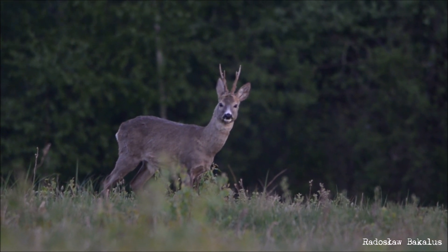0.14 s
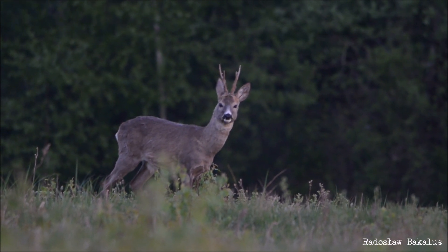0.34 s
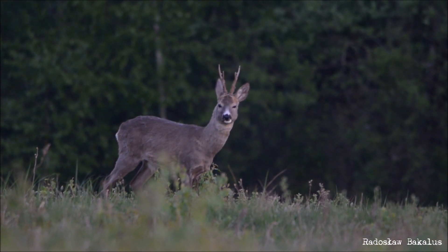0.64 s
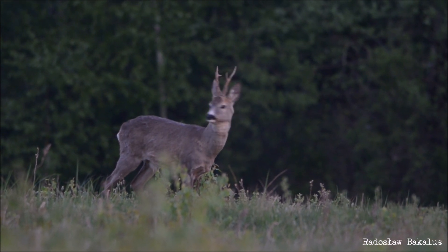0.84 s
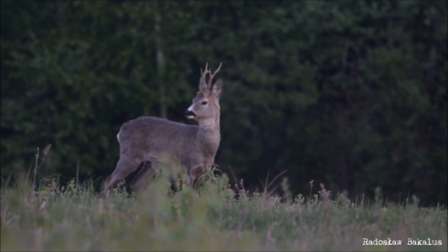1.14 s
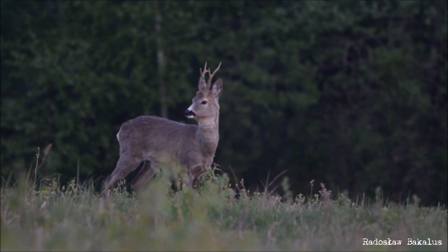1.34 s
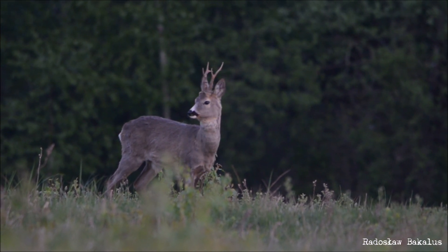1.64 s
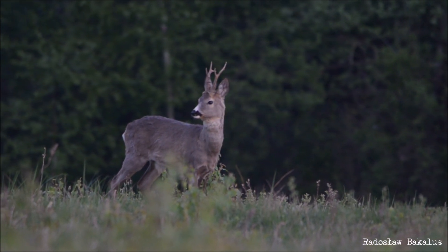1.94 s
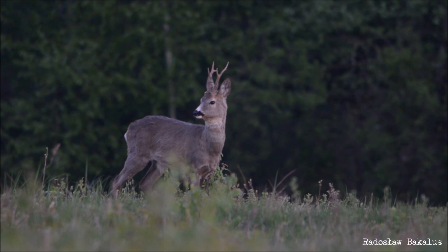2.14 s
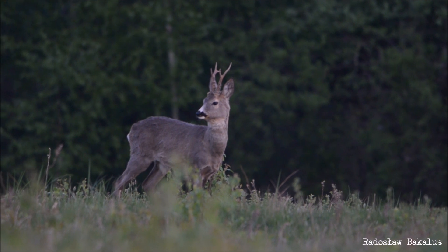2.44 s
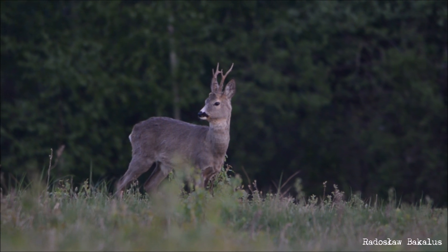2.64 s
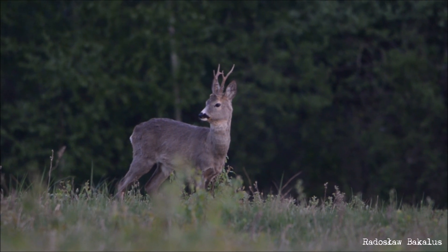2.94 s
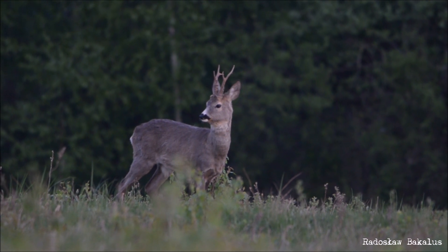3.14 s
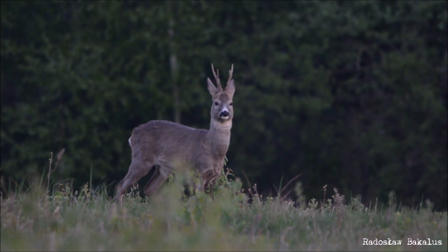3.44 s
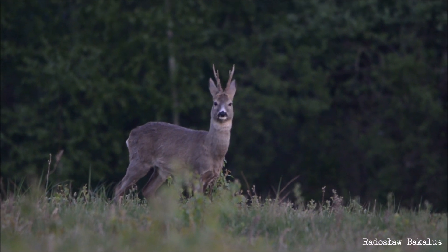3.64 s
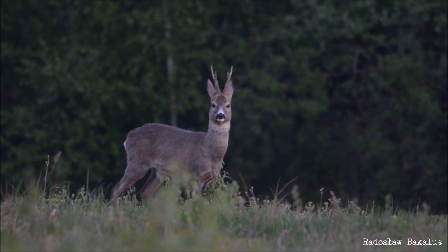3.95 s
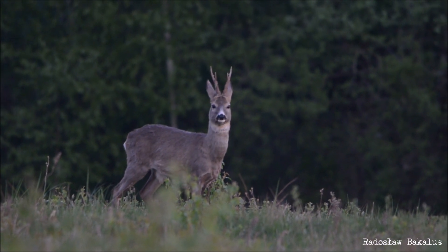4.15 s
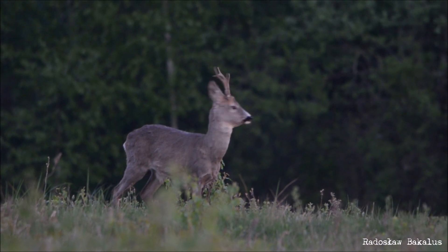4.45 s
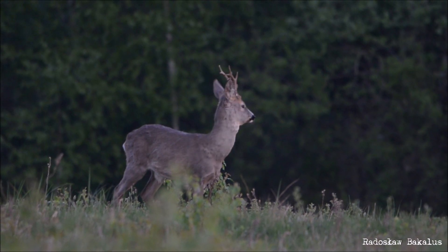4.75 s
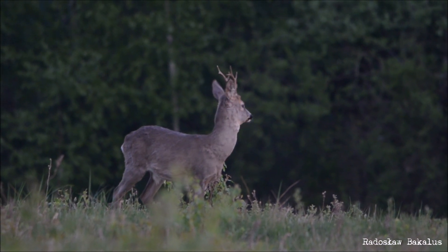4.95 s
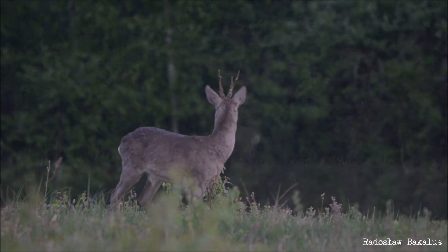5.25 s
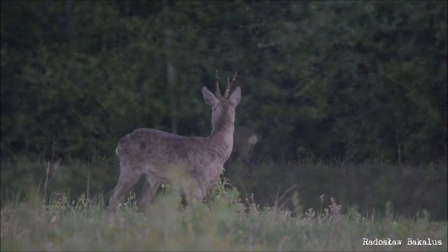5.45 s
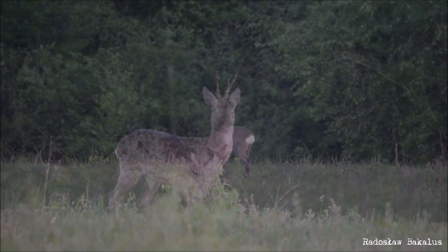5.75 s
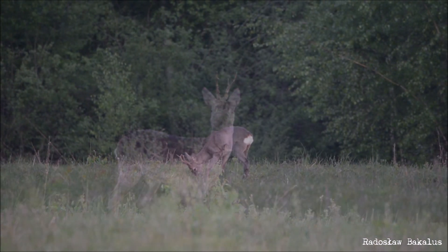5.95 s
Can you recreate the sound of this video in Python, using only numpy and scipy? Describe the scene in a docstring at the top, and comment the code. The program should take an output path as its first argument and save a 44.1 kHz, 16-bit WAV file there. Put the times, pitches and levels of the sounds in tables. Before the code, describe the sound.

Songbirds at a dusky forest edge: faint twitter and distant calls, housing clicks from a handled camera, then a loud close song over soft hiss.

```python
"""A meadow at a forest edge at dusk, heard through a small camera microphone: shaped noise as hiss that
grows louder near the end. Far birds among the trees are gliding sines sent through a decaying noise echo;
smooth bent whistles, low ones and one high falling one, sound in the open. The camera's plastic housing
snaps as it is handled: ticks ring damped modes. Songbirds, loud close ones and fainter distant ones, run
through warbles, swoops, trills and buzzes, all sines bent in pitch and level."""
import sys
import numpy as np
from scipy import signal
from scipy.fft import rfft, irfft
from scipy.io import wavfile
from scipy.ndimage import uniform_filter1d

SR = 44100
rng = np.random.default_rng(int(sys.argv[2]) if len(sys.argv) > 2 else 0)


def master_out(mix):
    """Clip the mix to full scale and print it as 16-bit PCM to the path in sys.argv[1]."""
    frames = np.transpose(np.atleast_2d(mix))
    ceiling = np.clip(frames, -1, 1)
    pcm = np.round(ceiling * 32767).astype(np.int16)
    wavfile.write(sys.argv[1], SR, pcm)


N = 269432
T = np.arange(N) / SR


def undb(db):
    """Amplitude factor of a level in dB."""
    return 10 ** (np.asarray(db) / 20)


def curve(rows):
    """Sample span covered by a table's first column (s), and its other columns interpolated there."""
    s, *columns = np.transpose(rows)
    span = slice(int(max(s[0], 0) * SR), min(int(s[-1] * SR), N))
    return span, [np.interp(T[span], s, c) for c in columns]


def wander(length, rate_hz):
    """Smooth random wobble of spread near 1: noise averaged twice."""
    k = int(SR / rate_hz)
    noise = rng.standard_normal(length + 2 * k)
    smooth = uniform_filter1d(uniform_filter1d(noise, k), k)[k:-k]
    return smooth * np.sqrt(1.7 * k)


def whistle(hz, db, edge_s=0.00076):
    """Sine that follows a pitch and an rms level, with soft ends."""
    t = np.arange(len(hz)) / SR
    ends = np.clip(np.minimum(t, t[::-1]) / edge_s, 0, 1)
    envelope = np.sqrt(2) * undb(db) * np.sin(np.pi / 2 * ends) ** 2
    return envelope * np.sin(2 * np.pi * np.cumsum(hz) / SR)


def glides(rows, waver_db=2.8, waver=0.0025, swell=0.108, swing=0, swing_hz=85):
    """Whistles that slide in pitch, swelling and wavering on their way through the air."""
    out = np.zeros(N)
    for s, length_s, first_hz, last_hz, db in rows:
        span, (hz, part) = curve([(s, first_hz, 0), (s + length_s, last_hz, 1)])
        shake = swing * np.sin(2 * np.pi * swing_hz * T[span])
        hz = hz * (1 + waver * wander(len(hz), 120) + shake)
        arch = np.sin(np.pi * (0.046 + 0.61 * part)) ** swell
        out[span] += arch * whistle(hz, db + waver_db * wander(len(hz), 149.7))
    return out


# Noise spectrum. Each row: frequency in Hz, relative density in dB per Hz.
HISS_SPECTRUM = [(15, -26.5), (30, 0.5), (45, 0.5), (100, 0), (400, -2), (1000, -5), (2700, -9),
                 (6000, -15.5), (16000, -19.5)]
# Hiss level. Each row: time in seconds, rms level in dB.
HISS_LEVEL = [(0, -56), (5.3, -56), (5.8, -52.5), (6.11, -52.5)]
# Faint narrow band in the hiss: centre in Hz, width in Hz, rms level in dB.
WHINE = (7220, 770, -76)


def hiss():
    """Microphone hiss and far rumble: white noise shaped in frequency, plus a faint narrow band."""
    bins_hz = np.fft.rfftfreq(N, 1 / SR)
    hz, db = np.transpose(HISS_SPECTRUM)
    gain = undb(np.interp(np.log(bins_hz + 1), np.log(hz), db))
    broad = irfft(rfft(rng.standard_normal(N)) * gain, N)
    centre_hz, width_hz, whine_db = WHINE
    band = np.exp(-((bins_hz - centre_hz) / width_hz) ** 2 * 2)
    whine = irfft(rfft(rng.standard_normal(N)) * band, N)
    level = undb(np.interp(T, *np.transpose(HISS_LEVEL)))
    return broad / np.std(broad) * level + whine / np.std(whine) * undb(whine_db)


# Chorus gain. Each row: time in seconds, level in dB.
CHORUS_LEVEL = [(0, -64.5), (.8, -65), (2.3, -66), (3.3, -60.5), (5.4, -58.5), (6.11, -51)]


def chorus(count=900):
    """Many far birds: short chips at random times and pitches, mostly falling."""
    when, size, low, high, slide, loud = rng.random((count, 6)).T
    first_hz = 3200 + 1500 * (low + high)
    last_hz = first_hz * (1.1 - .45 * slide)
    rows = np.transpose([when * T[-1], 0.00601 + .02 * size, first_hz, last_hz, -8 * loud])
    return glides(rows) * undb(np.interp(T, *np.transpose(CHORUS_LEVEL)))


# Twitter of a far bird. Each row: start in seconds, length in seconds, first Hz, last Hz, level in dB.
TWITTER = [(0, 0.076, 3840, 3792, -64.5), (0, 0.032, 4570, 4605, -47), (.058, 0.021, 4570, 4660, -52),
           (.14, 0.0288, 4610, 4813, -55), (.287, 0.011, 4260, 3220, -52), (.308, 0.03, 3460, 3357, -51),
           (.508, 0.013, 4547, 3340, -51), (.575, 0.018, 4300, 3555, -55), (.424, 0.017, 3570, 4500, -59),
           (.6, .016, 4110, 3390, -53), (.622, .016, 4050, 3480, -56), (.66, 0.024, 4800, 3490, -57.5)]
# Its shaking notes. Each row: start in seconds, length in seconds, first Hz, last Hz, level in dB.
SHAKES = [(.23, 0.043, 4530, 4420, -53), (.458, 0.036, 4420, 4590, -53.5), (.478, 0.032, 5090, 5000, -58.5),
          (.53, 0.039, 3735, 3785, -46.5)]


def twitter():
    """A far bird ends its twitter: plain glides, and notes whose pitch swings periodically."""
    return glides(TWITTER, waver_db=2.5, waver=0.0123) + glides(SHAKES, swing=0.032, swing_hz=85)


# Smooth whistles, low ones and one high falling one.
# Each row of a whistle: time in seconds, pitch in Hz, level in dB.
BENT_WHISTLES = [
    [(3.298, 2360, -57), (3.35, 2460, -59), (3.4, 2290, -53), (3.43, 2090, -59), (3.447, 1830, -62)],
    [(3.463, 1970, -58), (3.478, 2500, -56), (3.5, 2660, -58)],
    [(3.497, 2400, -55), (3.535, 2070, -63)],
    [(3.86, 2200, -65), (3.96, 2246, -64), (4.01, 2497, -57), (4.04, 2480, -60), (4.09, 1890, -56)],
    [(5.87, 6800, -54), (5.878, 5350, -45), (5.887, 5120, -44), (5.902, 5400, -46), (5.91, 4700, -54),
     (5.921, 3200, -49), (5.932, 3150, -50), (5.955, 3600, -51), (5.978, 3600, -59)],
]


def bent_whistles():
    """Smooth whistles in the open, low ones and one high falling one, their pitch bends rounded."""
    out = np.zeros(N)
    for bends in BENT_WHISTLES:
        span, (hz, db) = curve(bends)
        rounded_hz = uniform_filter1d(hz, size=200, mode="nearest")
        out[span] += whistle(rounded_hz, db, edge_s=0.0034)
    return out


FOREST_T60_S, EARLY_T60_S, EARLY_DB = 0.87, 0.065, 6.5


def forest(x):
    """Ground and near trunks give quick echoes, the wood behind a dense fading tail."""
    t = T[:SR]
    fade = 1000 ** (-t / FOREST_T60_S) + undb(EARLY_DB) * 1000 ** (-t / EARLY_T60_S)
    tail = rng.standard_normal(SR) * fade * np.clip(t / 0.0028, 0, 1)
    return signal.fftconvolve(x, tail / np.sqrt(np.sum(tail ** 2)))[:N]


KNOCK_SAG, KNOCK_SAG_S = 0.26, 0.004  # starting sharpness as a fraction, settling time


def ring(modes, stretch=1, sag=0):
    """Damped modes after a tick; each grip varies their level and tuning a little."""
    t = T[:SR // 10]
    bent = t + sag * KNOCK_SAG_S * (1 - np.exp(-t / KNOCK_SAG_S))  # starts sharp, then settles
    out = 0
    for (hz, db, t60_s), (detune, grip_db) in zip(modes, rng.standard_normal((len(modes), 2))):
        tone = np.sin(2 * np.pi * hz * stretch * (1 + 0.032 * detune) * bent)
        out = out + undb(db + grip_db) * tone * 1000 ** (-t / t60_s)
    return out


# Housing snaps. Each row: start in seconds, peak in dB, gap to the rebound in seconds, slip rate in Hz,
# hollow knock in dB, knock pitch factor, thud in dB.
SNAPS = [(3.129, -12, 0.0014, 4290, -16, 1.4, -30), (3.3706, -13, 0.0026, 3970, -22, 1.27, -29),
         (3.504, -23.5, 0.0029, 3600, -0.5, 0.68, -10), (3.6137, -14.5, 0.0022, 4800, 0.5, 1.216, -1.5),
         (3.654, -8, 0.0014, 4515, -15.5, 1.01, -8), (4.289, -25.5, 0.0019, 5430, 9, 0.88, -20),
         (4.3331, -13.5, 0.001298, 5530, 0.5, 0.952, -10.5)]
# Relative amplitudes of the ticks of one slip.
SLIP = [0.11, 0.42, 0.83, 0.65, 0.77]
# Modes of the shell, the hollow inside and the jolting whole body.
# Each row: nominal frequency in Hz, nominal level in dB, t60 in seconds.
SHELL = [(2200, 3, 0.015), (2900, 7, 0.0089), (3650, -1, 0.0088), (4200, 26, 0.0023), (4800, 9, 0.0063),
         (5450, 8.5, 0.012)]
HOLLOW = [(783, 8.5, 0.024)]
THUD = [(398, 10.5, 0.013)]
REBOUND_DB, GRIND, GRIND_DECAY_S = -4, 0.035, 0.0037


def snaps():
    """A joint slips in a few quick ticks, rebounds and grinds; the shell and the hollow inside ring."""
    out, t = np.zeros(N), T[:SR // 100]
    # a small shell radiates neither bass nor the highest treble
    shell_band = signal.butter(2, [1500, 6300], "band", fs=SR, output="sos")
    hollow_cut = signal.butter(2, 300, "high", fs=SR, output="sos")
    for s, peak_db, gap_s, slip_hz, hollow_db, stretch, thud_db in SNAPS:
        rebound = undb(REBOUND_DB) * (np.arange(len(t)) == int(gap_s * SR))
        grind = GRIND * rng.standard_normal(len(t)) * np.exp(-t / GRIND_DECAY_S)
        blow = (t == 0) + rebound + grind
        ticks = np.zeros(SR // 500)
        ticks[(np.arange(len(SLIP)) * SR / slip_hz).round().astype(int)] = SLIP
        shell = signal.sosfilt(shell_band, ring(SHELL))
        hollow = signal.sosfilt(hollow_cut, ring(HOLLOW, stretch, sag=KNOCK_SAG))
        # the slow hollow feels the whole slip as one push
        body = np.convolve(shell, ticks)[:len(shell)]
        body = body + undb(hollow_db) * hollow + undb(thud_db) * ring(THUD)
        snap = np.convolve(blow, body)
        out[int(s * SR):][:len(snap)] += undb(peak_db) * snap / np.abs(snap).max()
    return out


# Syllables, each one or more strokes of the voice.
# Each row of a stroke: seconds after the start, pitch in Hz, relative level in dB.
TICK = [
    [(0, 5764, -9), (.017, 5950, -3)],
    [(.025, 7100, -11), (.034, 5900, 3.5), (.043, 3300, 0)],
]
WARBLE = [
    [(0, 4172, -12), (.013, 4320, -10.5), (.016, 4646, -3.5), (.022, 6600, -25.5), (.027, 5436, -7.5),
     (.033, 2930, -23), (.038, 4332, -4.5), (.043, 4525, -7.5), (.052, 4520, -16)],
]
SWOOP = [
    [(0, 4800, -21.5), (.004, 4670, -9), (.012, 3857, -5.5), (.022, 3364, -2), (.03, 3200, -3),
     (.036, 3480, -19)],
]
ARCH = [
    [(-.017, 4800, -14), (-.009, 5590, -9), (-.005, 6800, -25)],
    [(0, 3790, -14.5), (.005, 4714, -3), (.01, 5095, -4.5), (.017, 3960, -9.5), (.022, 3710, -6.5),
     (.025, 4430, -12.5), (.031, 2720, -20.5)],
    [(.034, 3140, -13), (.044, 3680, -2), (.049, 4880, -29.5), (.054, 3410, -1)],
]
CARET = [
    [(-.02, 6310, -5), (-.014, 3530, -5.5)],
    [(0, 2607, -7), (.019, 2127, -9.5), (.026, 2660, -4), (.049, 3580, 1), (.052, 4926, -11),
     (.056, 3350, 3), (.072, 1714, -15)],
]
CASCADE = [
    [(0, 6600, -8), (.01, 5450, 0), (.02, 5200, -1)],
    [(.035, 5400, 2), (.047, 4020, -0.5), (.062, 3820, -7), (.095, 3500, -5), (.12, 3590, -9)],
]
# Each row: syllable, starts in seconds, level of the first in dB, change at each repeat in dB.
SONG = [(TICK, [3.468, 3.592, 3.714], -53, 2.6), (WARBLE, [3.809, 3.907, 4.004, 4.097], -35, 1.6),
        (SWOOP, [4.185, 4.255, 4.324, 4.392, 4.462, 4.532], -33.5, 0.051), (ARCH, [4.625, 4.79], -32, 0.7),
        (CARET, [5.03, 5.169, 5.312], -39, -0.46), (CASCADE, [.158, .543, .937, 1.311], -51.5, -2.5)]


def syllables():
    """Repeated syllables, loud close ones and fainter distant ones: strokes of drawn pitch and level."""
    out = np.zeros(N)
    for strokes, starts_s, first_db, step_db in SONG:
        for k, s in enumerate(starts_s):
            for stroke in strokes:
                span, (hz, db) = curve(np.array(stroke) + [s, 0, first_db + k * step_db])
                out[span] += whistle(hz, db, edge_s=0.00098)
    return out


# Sliding trills. Each row: start in seconds, length in seconds, first Hz, last Hz, first notes per second,
# first fall in Hz, level in dB, fade by the end in dB.
TRILLS = [(4.68, 0.041, 3548, 2105, 295, 1100, -40.5, -18),
          (5.548, 0.0376, 4940, 2200, 320, 1990, -38, -18),
          (5.666, 0.046, 3320, 4130, 200, 1000, -49.5, -4), (5.701, 0.22, 4256, 2100, 155, 1580, -41, -12)]
SLOWS_TO, SLOWS_S = 0.33, 0.038  # limit as a fraction of the first rate, time constant


def trills():
    """Trills that slide and slow down, each note a quick fall that levels off."""
    out = np.zeros(N)
    for s, length_s, first_hz, last_hz, notes_hz, fall_hz, db, fade_db in TRILLS:
        span, (done,) = curve([(s, 0), (s + length_s, 1)])
        slide = (last_hz / first_hz) ** done ** 0.75  # quick at first
        slowing = SLOWS_TO + (1 - SLOWS_TO) * np.exp(-done * length_s / SLOWS_S)
        part = np.cumsum(notes_hz * slowing) / SR % 1  # progress within one note
        # the falls scale with the slide
        hz = first_hz * slide + fall_hz * slide ** 1.73 * ((1 - part) ** 2.2 - .3)
        level_db = db + 1.1 * wander(len(hz), 200) + fade_db * done ** 1.74
        out[span] += np.sin(np.pi * part) * whistle(hz, level_db)
    return out


# Hoarse buzzes. Each row: start in seconds, loudest in seconds, end in seconds, centre in Hz, width in Hz,
# level in dB.
BUZZES = [(3.845, 3.911, 4.02, 4330, 3300, -37.5), (4.295, 4.323, 4.403, 5270, 2080, -39),
          (5.451, 5.502, 5.545, 5590, 2300, -45.5), (5.662, 5.695, 5.75, 4690, 1400, -45)]
BUZZ_RATE_HZ, BUZZ_GRAIN_DB, BUZZ_ENDS_DB, BUZZ_NARROWS = 380, 3, -8, 0.298


def buzzes():
    """An uneven flutter swings the pitch; the voice is strongest in the middle of the swing."""
    out = np.zeros(N)
    for start_s, loudest_s, end_s, centre_hz, width_hz, db in BUZZES:
        span, (slack,) = curve([(start_s, 1), (loudest_s, 0), (end_s, 1)])
        unrest = wander(len(slack), 400)
        flutter = 2 * np.pi * np.cumsum(BUZZ_RATE_HZ * (1 + 0.321 * unrest)) / SR
        swing = np.tanh(np.cos(flutter) + .5 * unrest)
        hz = centre_hz + width_hz / 2 * (1 - BUZZ_NARROWS * slack) * swing
        grain_db = BUZZ_GRAIN_DB * wander(len(slack), 160)
        level_db = db + grain_db + BUZZ_ENDS_DB * slack ** 1.66
        out[span] += np.exp(-3.2 * swing ** 2) * whistle(hz, level_db)
    return out


# Single whistles and chips. Each row: start in seconds, length in seconds, first Hz, last Hz, level in dB.
GLIDES = [(1.225, 0.062, 2315, 2111, -62.5), (1.77, 0.059, 4880, 5570, -65.5),
          (2.725, 0.057, 6300, 3310, -64), (2.875, 0.034, 6470, 6600, -67), (2.92, 0.053, 6100, 3580, -66),
          (3.07, 0.055, 5650, 3555, -60), (3.195, 0.065, 6100, 3360, -62.5),
          (3.268, 0.016, 2750, 2490, -62), (3.47, 0.024, 5500, 4800, -55),
          (3.585, 0.039, 2360, 2230, -57.5), (3.73, 0.067, 5600, 2609, -59),
          (4.843, 0.048, 3380, 2630, -40), (4.889, 0.047, 2700, 1950, -48),
          (4.92, 0.063, 6430, 5870, -65.5), (5.016, 0.0126, 5440, 4840, -44),
          (5.085, 0.066, 6470, 5980, -62), (5.15, 0.016, 5700, 5000, -53), (5.26, 0.1, 6730, 5130, -59.5),
          (5.448, 0.0105, 4450, 7060, -53), (5.45, 0.03, 4470, 5150, -52), (5.508, 0.0227, 5700, 3770, -49),
          (5.53, .022, 3810, 4485, -46), (5.555, 0.027, 4690, 4200, -45), (5.615, .025, 4800, 3750, -52),
          (5.642, .012, 1980, 3600, -49), (5.65, 0.0124, 6500, 4800, -56), (5.74, 0.042, 4300, 5270, -52),
          (5.8, 0.0093, 6030, 4600, -49.5), (5.9, 0.036, 4350, 5300, -51), (5.955, .01, 6030, 4640, -47),
          (6.055, 0.018, 4400, 4630, -62)]


def songbirds():
    """Single whistles, repeated syllables, trills and buzzes of close and distant birds, summed."""
    return glides(GLIDES) + syllables() + trills() + buzzes()


SONG_WET_DB, FAR_WET_DB, BENT_WET_DB = -4, 0.5, -6


def scene():
    """Direct birds, their forest echo, snaps and hiss; the chorus arrives only through the trees."""
    song, bent, far = songbirds(), bent_whistles(), twitter()
    sent = undb(SONG_WET_DB) * song + undb(FAR_WET_DB) * far + undb(BENT_WET_DB) * bent
    wet = forest(sent + chorus())
    return (song + far + bent + wet + snaps() + hiss())[None]


TOP_HZ = 15850


def record(dry):
    """The recorder cuts the top with a steep low-pass."""
    low_pass = signal.ellip(10, .2, 60, TOP_HZ, fs=SR, output="sos")
    return signal.sosfilt(low_pass, dry)


dry = scene()
out = record(dry)
master_out(out)
```